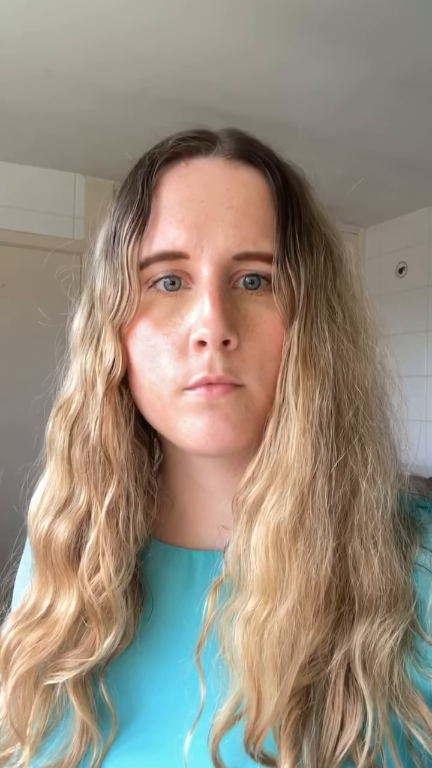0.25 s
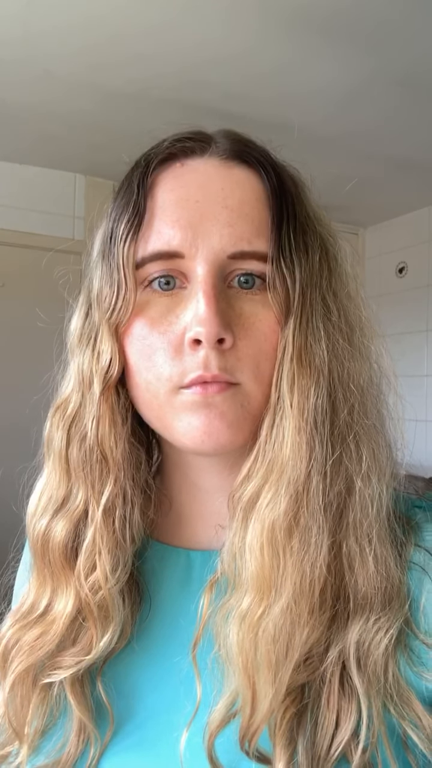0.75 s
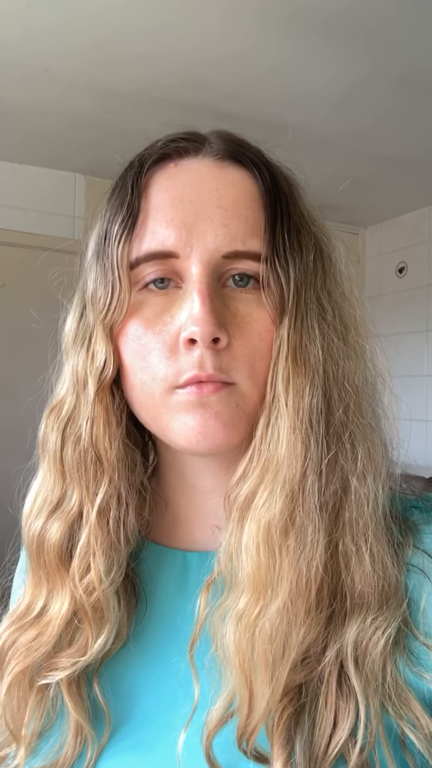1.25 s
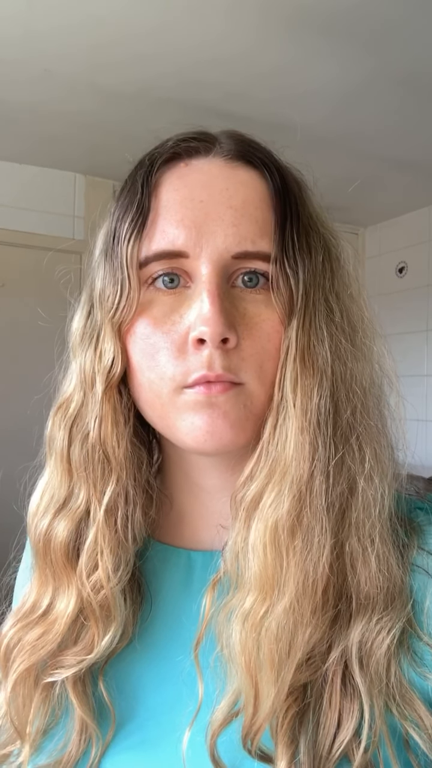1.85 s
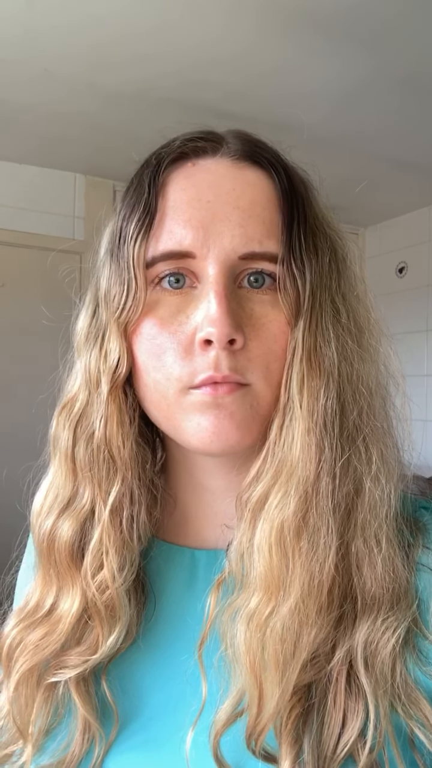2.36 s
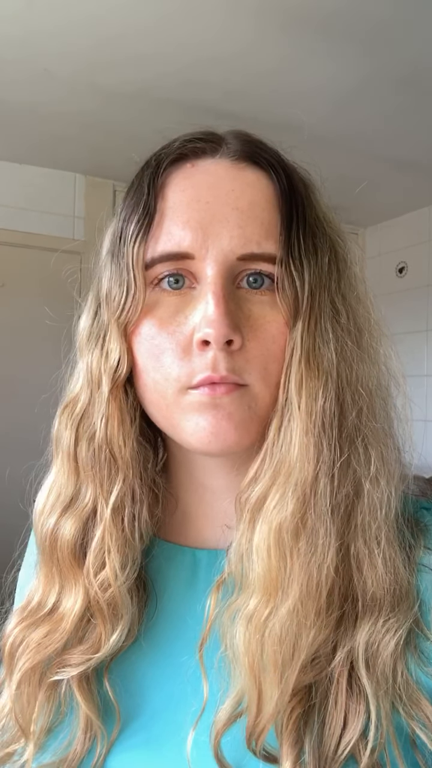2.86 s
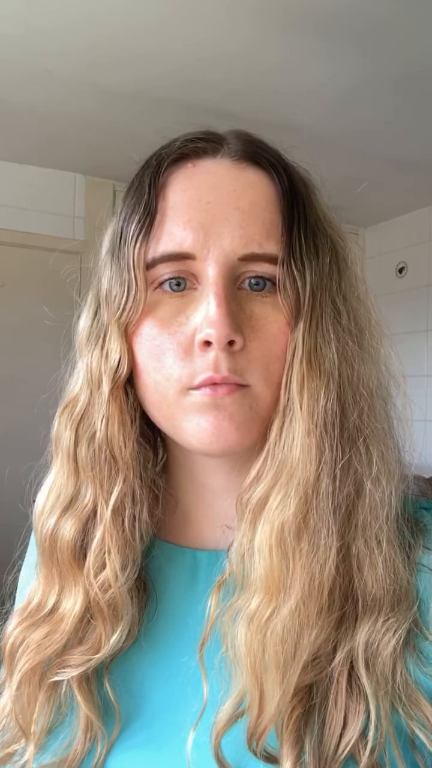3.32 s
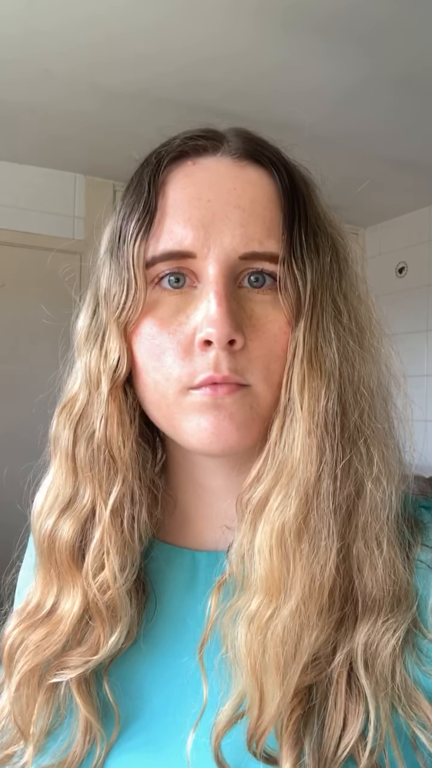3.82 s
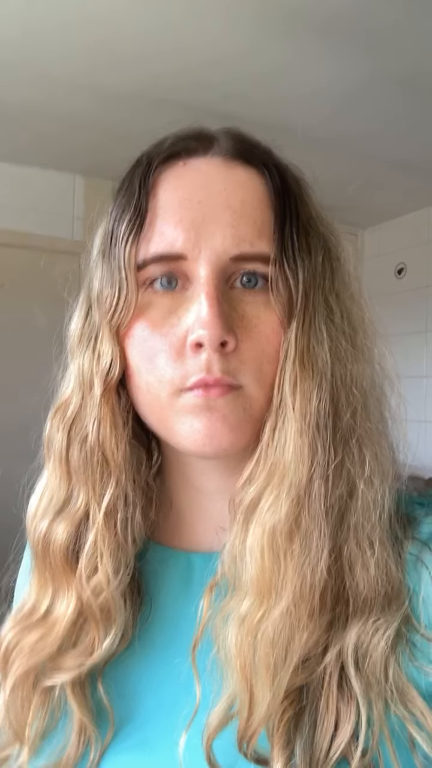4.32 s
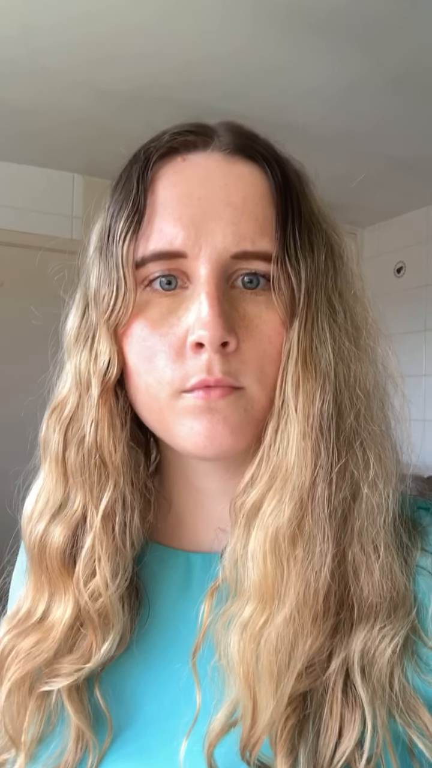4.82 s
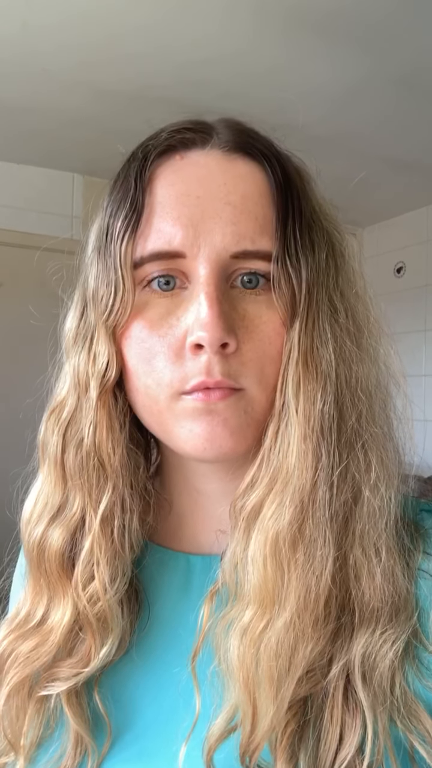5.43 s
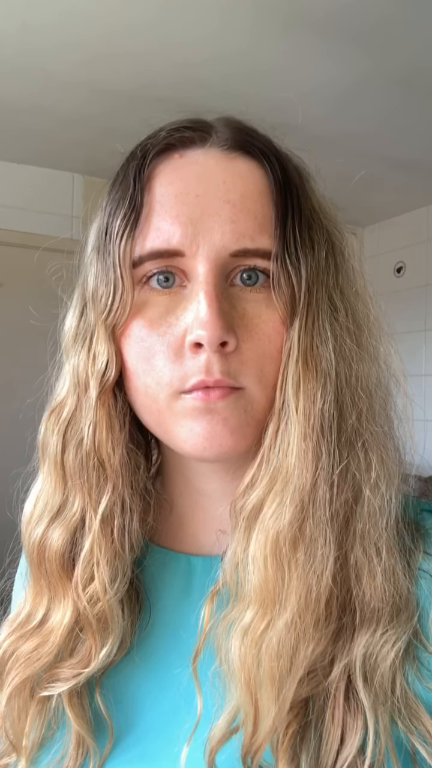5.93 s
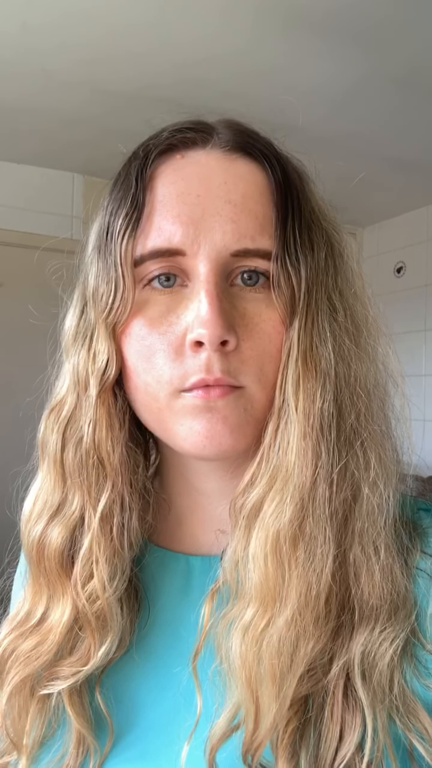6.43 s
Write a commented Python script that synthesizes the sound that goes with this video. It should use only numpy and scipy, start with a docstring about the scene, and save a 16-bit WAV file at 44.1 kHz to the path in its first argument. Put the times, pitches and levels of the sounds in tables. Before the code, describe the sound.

Sharp, glassy fingertip taps on a phone screen, unevenly spaced and very close, with one tiny skin squeak, over a faint low room hum.

```python
"""A quiet room, with a phone in it and fingertips tapping its screen right at the microphone.
Each tap is a sharp click of the glass, shaped by spot, case knock and nail, with a soft low push of the
whole phone; the room answers faintly. Light finger touches tick more dully, and one finger rubs in
noisy slips, grips and lets go. A steady low hum of wavering tones, rumble and thin hiss lies beneath."""
import sys
import numpy as np
from scipy import signal
from scipy.fft import rfft, irfft
from scipy.io import wavfile

SR = 44100
rng = np.random.default_rng(int(sys.argv[2]) if len(sys.argv) > 2 else 0)


def pcm_store(signal):
    """Save signal as 16-bit PCM."""
    levels = np.round(np.clip(np.atleast_2d(signal), -1, 1) * 32767)
    wavfile.write(sys.argv[1], SR, levels.astype(np.int16).T)


N = 294581
TAP_SIZE = 4096  # samples in one click
HZ = np.fft.rfftfreq(TAP_SIZE, 1 / SR)


def amp(db):
    """Decibels to gain."""
    return 10 ** (np.asarray(db) / 20)


def unit(x):
    """Scales to rms 1."""
    return x / np.sqrt(np.mean(x ** 2) + 1e-20)


def read(points, hz, axis=1):
    """Reads one column of a table along log frequency."""
    table = np.transpose(points)
    return np.interp(np.log(hz + 1), np.log(table[0] + 1), table[axis])


def add(mix, s, sound):
    """Mixes a sound in at time s."""
    part = mix[round(s * SR):][:len(sound)]
    part += sound[:len(part)]


def noise(colour):
    """Steady noise of rms 1, its spectrum shaped by a table."""
    spectrum = rfft(rng.standard_normal(N))
    gain = amp(read(colour, np.fft.rfftfreq(N, 1 / SR)))
    return unit(irfft(spectrum * gain, N))


def drift(rate_hz):
    """Random wander of rms 1, smooth above rate_hz."""
    spectrum = rfft(rng.standard_normal(N))
    smoothing = np.exp(-(np.fft.rfftfreq(N, 1 / SR) / rate_hz) ** 2)
    return unit(irfft(spectrum * smoothing, N))


# Tones of the appliance in the room: (f/Hz, level/dB rms), both wavering around these values
HUM_TONES = [(99.5, -70), (153.3, -60.5), (196, -72.5), (306.7, -68.5), (446.8, -78)]
# Colour of the low rumble in the room: (f/Hz, relative level/dB per Hz)
RUMBLE_COLOUR = [(25, -42.5), (40, -18.5), (52, 1.5), (68, 0.5), (85, -7), (115, 0.5), (138, 11), (170, 4),
                 (250, -1.5), (350, -1), (470, -5.5), (600, -31.5)]
# Colour of the thin hiss: (f/Hz, relative level/dB per Hz)
HISS_COLOUR = [(290, -32.5), (500, -1), (718, -6), (868, -7.5), (1320, -11), (1930, -16.5), (2100, -17.5),
               (6230, -19), (15100, -33), (16000, -36.5)]
RUMBLE_DB, HISS_DB = -62, -68  # rms levels


def background(waver_db=1.0, waver_hz=0.35):
    """An appliance hums in tones of wavering pitch and level, over low rumble and a thin hiss."""
    hum = np.zeros(N)
    for hz, level_db in HUM_TONES:
        turns = np.cumsum(hz + waver_hz * drift(rate_hz=3)) / SR
        tone = unit(np.sin(2 * np.pi * turns))
        hum += amp(level_db + waver_db * drift(rate_hz=4)) * tone
    return hum + amp(RUMBLE_DB) * noise(RUMBLE_COLOUR) + amp(HISS_DB) * noise(HISS_COLOUR)


def hump(centre_hz, octaves):
    """A bell of height 1 on log frequency."""
    return np.exp(-.5 * (np.log2((HZ + 1) / centre_hz) / octaves) ** 2)


def struck(db):
    """Causal impulse response with the given spectrum: each peak rings after the blow."""
    log_gain = np.log(amp(db))
    circle = np.concatenate([log_gain, log_gain[-2:0:-1]])  # both halves of the spectrum
    minimum_phase = np.exp(np.conj(signal.hilbert(circle)))
    return np.fft.ifft(minimum_phase).real


# Click of the glass at each spot struck; dips are modes that stand still there: spot: (f/Hz, level/dB)
GLASS = {"middle": [(120, -25), (280, -8), (390, -20), (560, -5), (840, -6), (1020, -15), (1500, -9),
         (2150, -18.5), (2500, -12.5), (3100, -16), (5900, -1), (7700, 0), (9000, -9), (16000, -23)],
         "corner": [(120, -32), (300, -23), (480, -8), (680, 1), (1050, -14), (1500, -12.5), (2100, -14.5),
         (2800, -7), (4400, -10), (5800, 2.5), (7900, -3), (9500, -11.5), (13000, -16), (16000, -24.5)],
         "rim": [(150, -8), (350, -24), (560, -5), (800, -3), (1050, -16), (1600, -9), (2400, -19.5),
         (3400, -1.5), (6000, -0.5), (7900, -3), (10000, -17), (15000, -31)], "edge": [(120.0, -35),
         (260.0, -20), (385.0, -24.5), (600.0, -5.5), (880.0, -6), (1150.0, -26.5), (1650.0, -11),
         (3650.0, -13), (4500.0, -2.5), (5900.0, -14.5), (7400.0, 1.5), (10000.0, -18.5), (12800.0, -10.5),
         (16000.0, -19.5)]}


def screen(spot, knock_db, clack_db, nail_db, bass_hz=90):
    """Spectrum of a blow in dB: the spot and the nail decide how much case and glass answer."""
    bass_cut_db = -20 * np.log10(1 + (bass_hz / (HZ + 10)) ** 2)
    knock = knock_db * hump(centre_hz=705, octaves=0.83)
    clack = clack_db * hump(centre_hz=2850, octaves=0.62)
    nail = nail_db * hump(centre_hz=13364, octaves=0.39)
    return read(GLASS[spot], HZ) + bass_cut_db + knock + clack + nail


def through_phone(click, lag_s=.0012, scatter_db=-19, scatter_t60=0.015):
    """Bending waves bring the treble first and the lows later; hand and case scatter a little just after."""
    t = np.arange(TAP_SIZE) / SR
    bending = np.exp(-4j * np.pi * lag_s * np.sqrt(1000 * HZ))  # lag_s is the delay at 1 kHz
    scatter = rng.standard_normal(TAP_SIZE) * amp(-60 * t / scatter_t60) * (t > .001)
    scattered = amp(scatter_db) * rfft(scatter) / np.linalg.norm(scatter)
    sound = irfft(rfft(click) * bending * (1 + scattered))
    return sound * np.cos(np.pi / 2 * t / t[-1]) ** 2  # fade out by the end of the buffer


def push(peak_db, low_hz=55, high_hz=92, press_s=0.0019):
    """The finger's press nudges the whole phone; the microphone's bass cut turns that into a short thud."""
    t = np.arange(SR // 4) / SR
    bass_cut = signal.butter(7, low_hz, "high", fs=SR, output="sos")
    treble_cut = signal.butter(3, high_hz, fs=SR, output="sos")
    thud = signal.sosfilt(np.vstack([bass_cut, treble_cut]), np.exp(-t / press_s))
    return amp(peak_db) * thud / abs(thud).max()


# The room's answer in each band: (f/Hz, relative level/dB, t60/s)
ROOM_BANDS = [(300, 2.5, 0.27), (800, 2, 0.3), (1800, -2, 0.2), (3500, -1, .35), (7600, 1.5, .33),
              (10000, 0, 0.21), (14680, -4.5, 0.33)]


def room(treble_db, first_s=.003, uneven_db=4):
    """A small room's answer to a sharp click: dense reflections, each band dying at its own speed."""
    t = np.arange(SR // 2) / SR
    signs = rng.choice([-1., 1.], len(t))
    echoes = signs * amp(uneven_db * rng.standard_normal(len(t))) * (t > first_s)
    hz, age, bands = signal.stft(echoes, SR, nperseg=256)
    colour_db = read(ROOM_BANDS, hz) + treble_db * np.clip(hz / 7000 - 1, 0, 1)
    decay_db = -60 * age / read(ROOM_BANDS, hz, axis=2)[:, None]
    tail = signal.istft(bands * amp(colour_db[:, None] + decay_db), SR, nperseg=256)[1]
    return tail / np.linalg.norm(tail)


# Taps at the microphone: (t/s, spot on the screen, force level/dB, case knock level/dB, mid clack level/dB,
# nail brightness level/dB, mode muted by the finger f/Hz, low push peak level/dB)
TAPS = [(0.4164, "corner", 10.5, 7.5, -6.5, 7.5, 4650, -51),
        (0.7422, "edge", 14.5, -4, -4, 1.3, 3550, -53.5), (1.6606, "middle", 15, 1, -1, -7.5, 2850, -45),
        (2.4524, "middle", 15.5, -2, -1.5, -3.5, 3150, -50.5), (3.3006, "rim", 3.5, -4, -1, 4.5, 1050, -50),
        (3.9994, "middle", 15, -11, -2.5, 1.5, 1340, -42.5),
        (5.1196, "corner", 13.5, -0.5, 0, -5.5, 1277, -48),
        (5.6096, "edge", 12.5, -2.5, -1, 1.5, 6100, -47), (5.7591, "edge", 11.5, -3, -1, 1.5, 5800, -46.5)]
# Treble that each spot sends into the room: spot: level/dB
ROOM_TREBLE_DB = {"middle": 2, "corner": -3, "rim": -9, "edge": -0.2}
ROOM_SEND_DB = -31.5  # room level against the force
ROOM_PER_KNOCK = 0.54  # dB more room per dB of knock, as the case radiates
ROOM_PER_NAIL = 0.21  # dB more room treble per dB of nail
MUTED_DB, MUTED_OCTAVES = -11, 0.053  # depth and width of the dip that the resting finger makes


def taps():
    """Clicks of the glass, each with its push; the room answers by force, knock and nail."""
    out = np.zeros(N)
    for s, spot, force_db, knock_db, clack_db, nail_db, muted_hz, push_db in TAPS:
        muting_db = MUTED_DB * hump(muted_hz, MUTED_OCTAVES)
        colour_db = screen(spot, knock_db, clack_db, nail_db) + muting_db
        add(out, s, through_phone(struck(force_db + colour_db)))
        add(out, s, push(push_db))
        room_db = ROOM_SEND_DB + force_db + ROOM_PER_KNOCK * knock_db
        treble_db = ROOM_TREBLE_DB[spot] + ROOM_PER_NAIL * nail_db
        add(out, s, amp(room_db) * room(treble_db))
    return out


# Light touches of the finger pad: (t/s, peak level/dB, case knock level/dB, treble level/dB,
# low push peak level/dB)
TOUCHES = [(3.3552, -43, 5, -5, -73), (4.1291, -44, 8, -34, -56), (5.289, -41, 9, -6.5, -73.5),
           (5.3005, -42.5, 9, -14.5, -50.5), (5.3668, -48.5, 4, -13, -80)]


def touches(clack_db=7, nail_db=-8):
    """The soft pad of the finger gives faint, duller ticks."""
    out = np.zeros(N)
    for s, peak_db, knock_db, treble_db, push_db in TOUCHES:
        softness_db = treble_db * hump(centre_hz=7200, octaves=1.2)
        colour_db = screen("middle", knock_db, clack_db, nail_db) + softness_db
        tick = through_phone(struck(colour_db))
        add(out, s, amp(peak_db) * tick / abs(tick).max())
        add(out, s, push(push_db))
    return out


def swell(t, attack_s, hold_s, release_s):
    """Rises exponentially to 1 at t = 0, holds, and dies away."""
    return np.exp(np.minimum(t, 0) / attack_s - np.maximum(t - hold_s, 0) / release_s)


# Colour of skin rubbing on the glass: (f/Hz, relative level/dB)
RUB_COLOUR = [(150, 2), (400, 3.5), (700, -4), (1100, -2), (2100, -14.5), (2900, -9), (3800, -21.5),
              (7000, -19), (15000, -29)]
RUB_S, GRIP_S, RELEASE_S = 4.135, 4.175, 4.1795  # the finger starts to creep, grips, and lets go
SLIP_HZ, GRIP_HALVES_S = 670, .0078  # mean slips per s before the grip; time in which the grip halves that
CREEP_DB, SCRAPE_DB, SQUEAK_DB = -66.5, -42, -38.5  # levels before the grip slows the finger
SCRAPE_LEAD_S = 0.0024  # the scrape reaches full strength this long before the grip
RELEASE_PUSH_DB, RELEASE_TOP_HZ = -38.5, 200  # the spring back is quicker than a press: it reaches higher


def rub(jitter=0.101, uneven=0.36):
    """Skin creeps, scrapes and squeaks in strong and weak slips, slows as it grips; the phone springs back."""
    t = np.arange(N) / SR - GRIP_S
    speed = 1 / (1 + (np.maximum(t, 0) / GRIP_HALVES_S) ** 4)
    slips = np.cumsum(SLIP_HZ * speed * (1 + jitter * drift(rate_hz=395))) / SR
    # the half-rate tone makes strong and weak slips alternate
    stick_slip = unit(np.sin(2 * np.pi * slips) + uneven * np.sin(np.pi * slips))
    squeak = amp(SQUEAK_DB) * swell(t, attack_s=0.0028, hold_s=.0085, release_s=.0018) * stick_slip
    creep = amp(CREEP_DB) * (t > RUB_S - GRIP_S)
    scrape = amp(SCRAPE_DB) * swell(t + SCRAPE_LEAD_S, attack_s=.007, hold_s=0.0032, release_s=0.0027)
    out = squeak + (creep + scrape) * speed * noise(RUB_COLOUR)
    add(out, RELEASE_S, push(RELEASE_PUSH_DB, high_hz=RELEASE_TOP_HZ))
    return out


def scene():
    """Taps, touches and the rub in the humming room."""
    return (background() + taps() + touches() + rub())[None]


def record(dry, ceiling=0.98, edge_hz=16300):
    """The sharpest peaks are rounded off; then a low-pass sets the band limit."""
    rounded = dry / (1 + (dry / ceiling) ** 4) ** (1 / 4)
    low_pass = signal.firwin(301, edge_hz, window=("kaiser", 9), fs=SR)
    return signal.oaconvolve(rounded, low_pass[None], "same")


dry = scene()
out = record(dry)
pcm_store(out)
```